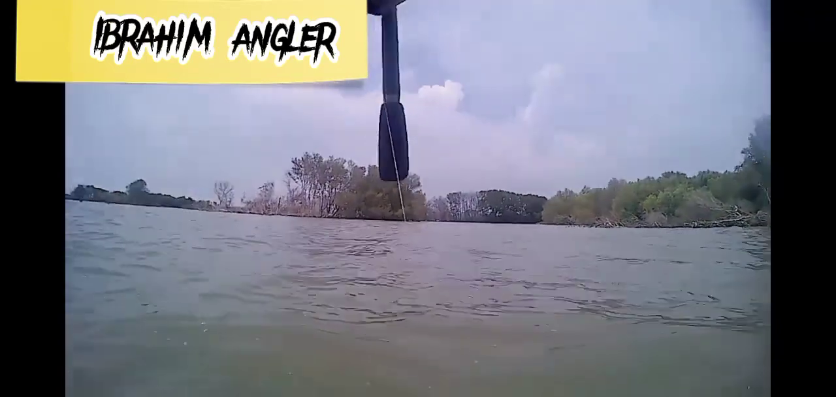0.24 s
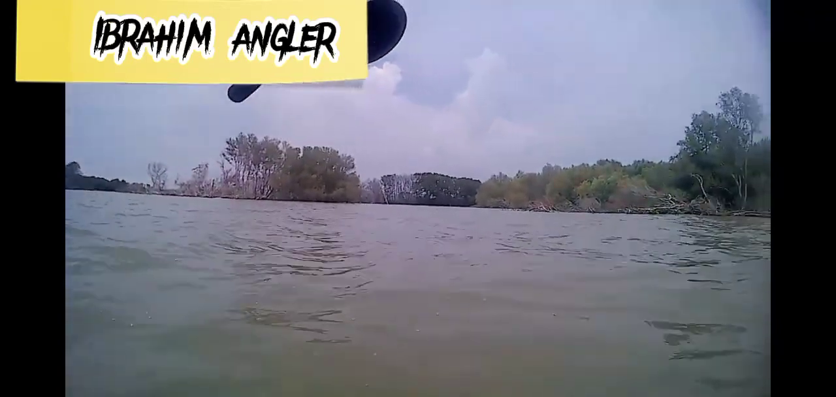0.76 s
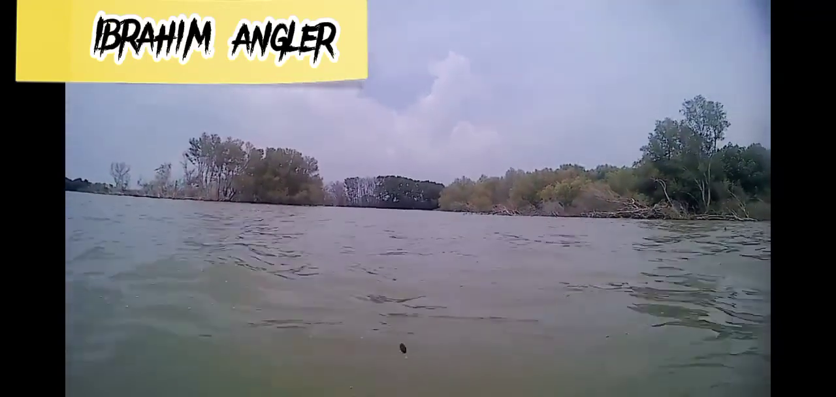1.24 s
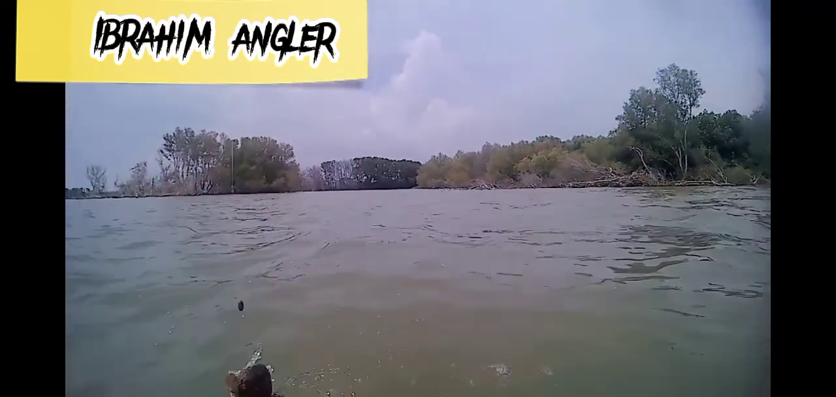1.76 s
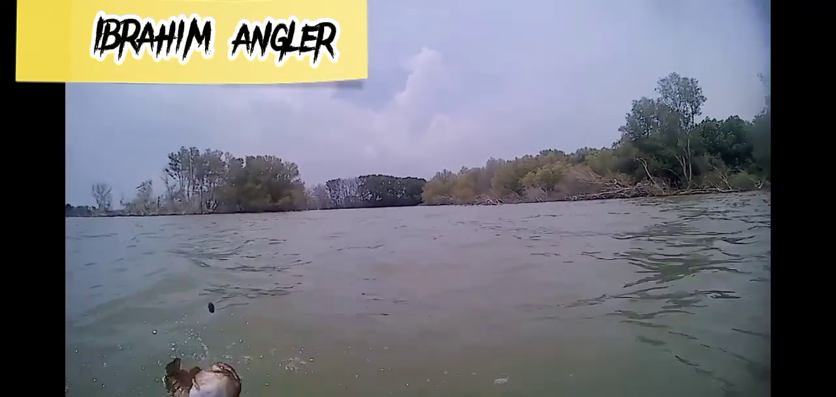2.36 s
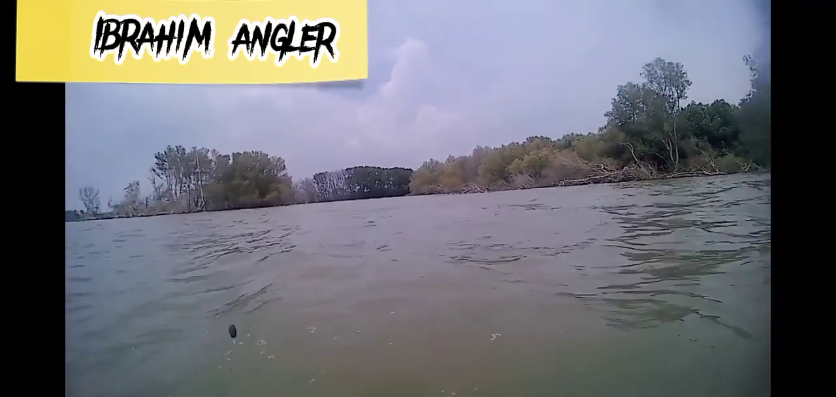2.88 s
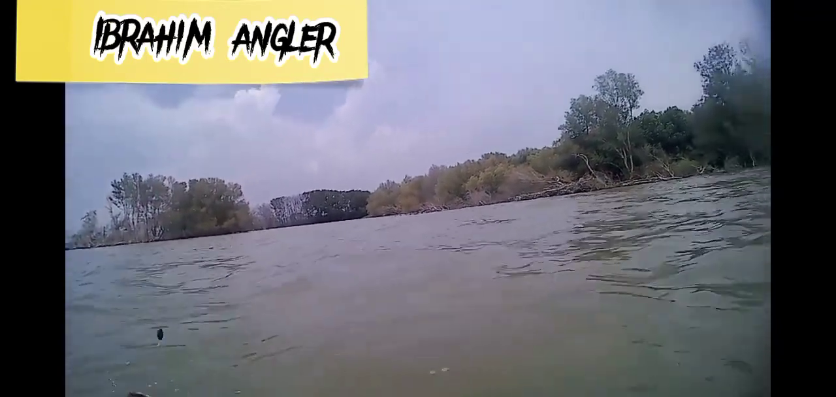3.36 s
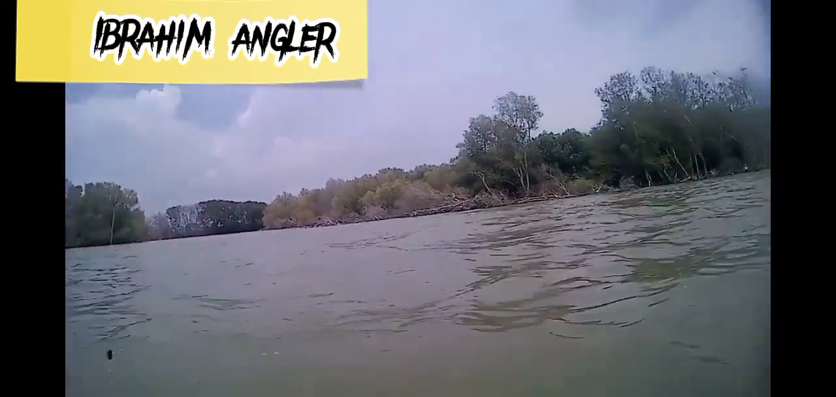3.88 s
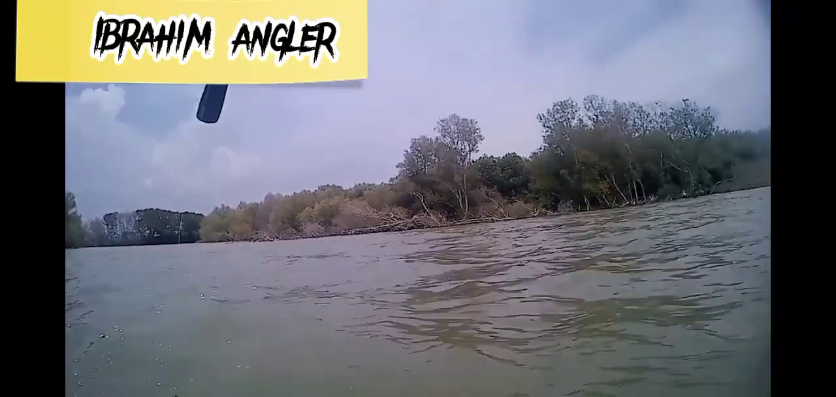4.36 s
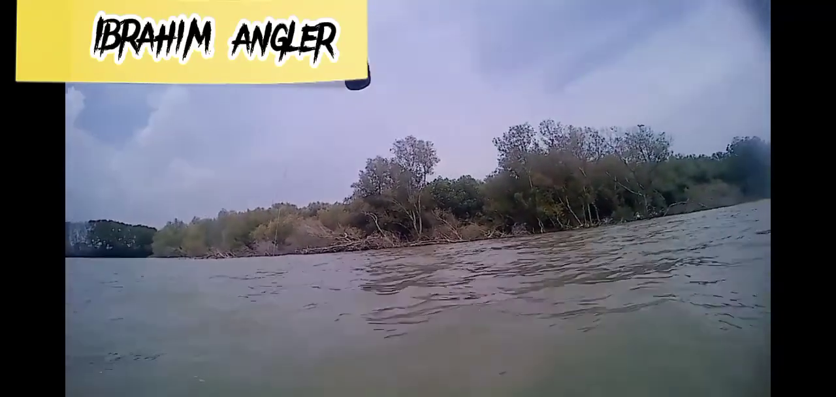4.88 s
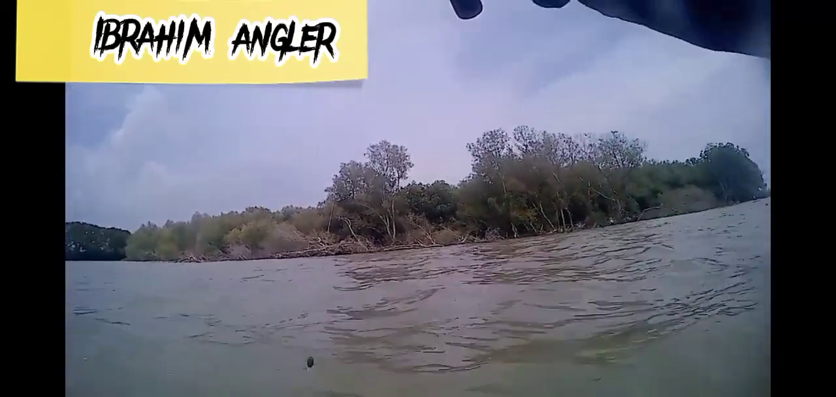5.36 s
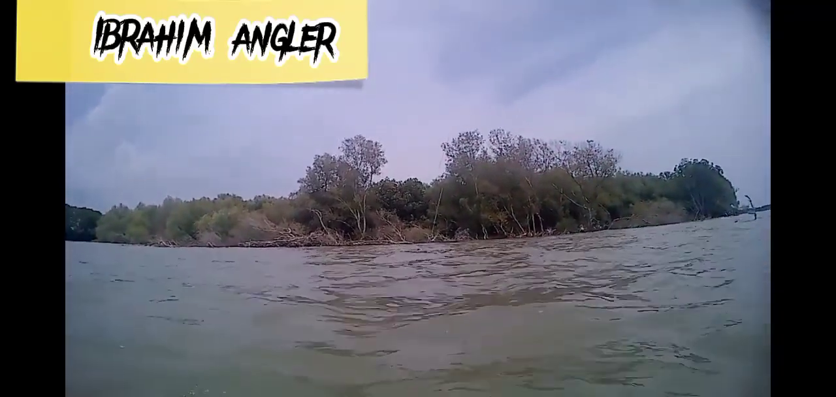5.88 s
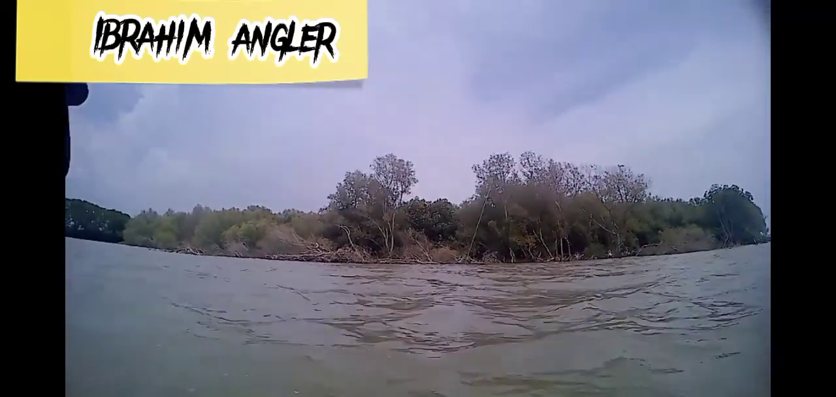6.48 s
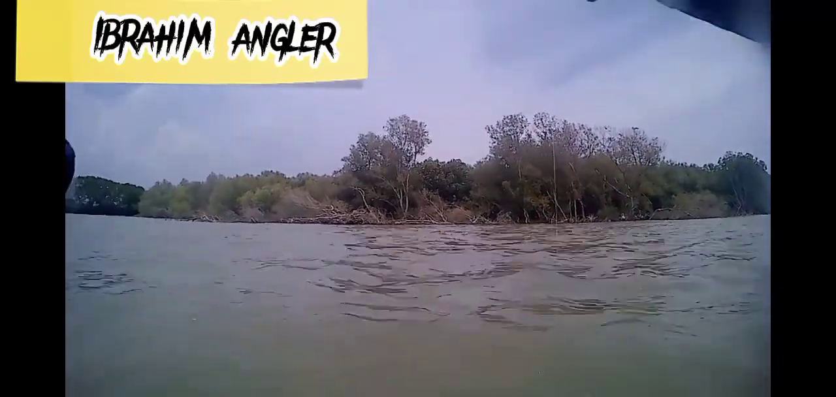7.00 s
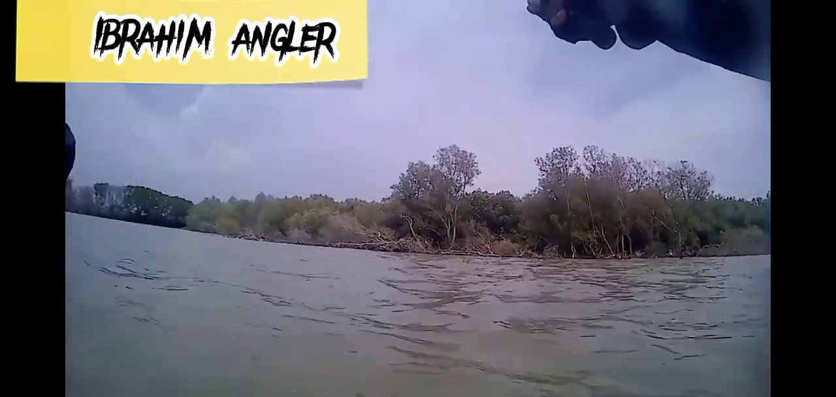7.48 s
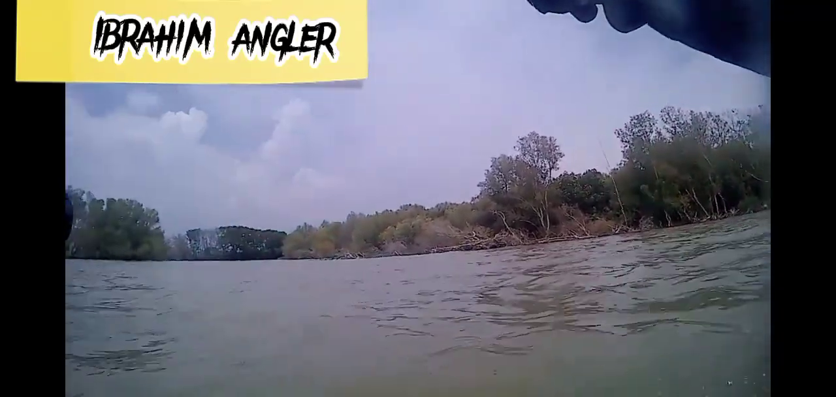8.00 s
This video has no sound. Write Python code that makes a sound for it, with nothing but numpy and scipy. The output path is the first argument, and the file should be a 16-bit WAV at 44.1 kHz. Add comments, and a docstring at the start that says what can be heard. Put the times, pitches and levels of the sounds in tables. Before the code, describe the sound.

A microphone sealed in a plastic case sits just above lake water. After a quiet start, wet slaps and ringing bubbles form one loud splash, followed by gentle uneven lapping, scattered drips and soft plops. Near the end another slosh knocks the case with short low booms and spray, fading to faint trickles. Treble is dull, with thin steady hiss and faint open air.

```python
"""On a lake: water sloshes around a small recorder in a waterproof case held just over the surface.
A sharp splash comes early, wavelets lap and plop, and a second slosh bumps the case with hollow thuds.
Lapping, spray and plops are built from short rising tones and noise; thuds are low, dying tones.
The water's bubbles pass through a ringing plastic shell, and a narrow-band recorder adds a faint hiss."""
import sys
import numpy as np
from scipy import signal
from scipy.fft import rfft, irfft
from scipy.io import wavfile
from scipy.ndimage import uniform_filter1d

SR = 44100
rng = np.random.default_rng(int(sys.argv[2]) if len(sys.argv) > 2 else 0)


def int16_out(signal):
    """Quantize to a 16-bit WAV file."""
    q = np.round(np.clip(np.atleast_2d(signal).T, -1, 1) * 32767)
    wavfile.write(sys.argv[1], SR, q.astype(np.int16))


N = 363384  # length of the scene in samples

# Colour of the dull rumble of moving water. Each row: frequency in Hz, relative level in dB.
SURGE_COLOUR = [(20, -3), (60, -2), (95, -1), (150, -4), (230, -6.5), (350, -9.5), (700, -14.5),
                (1200, -21.5), (2500, -23), (4000, -31)]


def amp(db):
    """Turn decibels into a gain."""
    return 10 ** (np.asarray(db) / 20)


def unit(x):
    """Scale a sound to an average (rms) level of 1."""
    return x / np.sqrt(np.mean(x ** 2))


def add(out, start_s, x):
    """Mix x into out from a given time, dropping what runs past the end."""
    i = int(start_s * SR)
    out[i:i + len(x)] += x[:len(out) - i]


def noise(colour):
    """Noise of rms 1, shaped by a table of frequencies in Hz and levels in dB."""
    hz, db = np.transpose(colour)
    bins = np.fft.rfftfreq(N, 1 / SR)
    # Pitch is judged by ratios, so the levels are joined up on a log frequency scale.
    gain = amp(np.interp(np.log(bins + 1), np.log(hz), db))
    spectrum = rfft(rng.standard_normal(N))
    return unit(irfft(spectrum * gain, N))


def walk(rate):
    """A wandering curve of rms 1 that slides to a new random value about `rate` times a second."""
    step = int(SR / rate)
    held = np.repeat(rng.standard_normal(N // step + 1), step)
    return unit(uniform_filter1d(held, step)[:N])


def shell(x):
    """The case passes sound mostly at the resonances of its plastic walls."""
    # The resonances of the walls. Each row: frequency in Hz, width in Hz, level in dB.
    resonances = [(444, 370, -20), (960, 180, -11.5), (1296, 99, -1.5), (1821, 217, -4.5), (2529, 61, -9.5),
                  (2760, 160, -18), (3413, 193, -12.5)]
    out = 0
    for k, (hz, width_hz, db) in enumerate(resonances):
        b, a = signal.iirpeak(hz, hz / width_hz, SR)
        out = out + (-1) ** k * amp(db) * signal.lfilter(b, a, x)  # neighbours have opposite signs
    return out


def bubble(hz, t60, rise=0.1, swell=0.014):
    """A pocket of air pinches off and rings out, its pitch rising as it nears the surface."""
    t = np.arange(int(t60 * SR)) / SR
    age = t / t60  # 0 at the start, 1 when the ring has died away by 60 dB
    tone = np.sin(2 * np.pi * hz * t * (1 + rise * age))
    onset = 1 - np.exp(-age / swell)
    return tone * onset * np.exp(-np.log(1000) * age)


def fizz(length, rate, spread_db, cycles, smooth, open_share):
    """A crowd of tiny bubbles of all sizes over a smooth rush, mostly heard through the shell; rms 1."""
    crowd = np.zeros(length)
    count = int(rate * length / SR) + 1  # rate is in bubbles per second
    for when, size, pitch, ring in rng.random((count, 4)):
        hz = 750 * 4.6 ** pitch
        gain = amp(-spread_db * np.log(size + 0.027))  # a few bubbles stand out
        add(crowd, when * length / SR, gain * bubble(hz, cycles * (0.41 + ring) / hz))
    crowd = unit(crowd)
    rush = smooth * rng.standard_normal(length)
    return unit(shell(crowd + rush) + open_share * crowd)


def treble(x, edge_hz=2250):
    """The part of a sound that comes from the finest drops."""
    high_pass = signal.butter(4, edge_hz, "high", fs=SR, output="sos")
    return signal.sosfiltfilt(high_pass, x)


def waves():
    """Level of the lapping in dB: each wavelet swells to its crest and drains away, over calm water."""
    # Wavelets against the case. Each row: crest in seconds, level in dB,
    # rise in seconds, fall in seconds; rise and fall each span 10 dB.
    wavelets = [(0.8, -42.5, 0.2, 0.17), (1.35, -52.5, 0.16, 0.28), (1.73, -54.5, 0.11, 0.28),
                (2.03, -53.5, 0.24, 0.21), (2.82, -61.5, 0.15, 0.12), (3.88, -51.5, 0.13, 0.12),
                (4.27, -54.5, 0.26, 0.14), (4.82, -51.5, 0.27, 0.33), (5.48, -53, 0.71, 0.52),
                (5.95, -57.5, 0.29, 0.18), (6.93, -41, 0.2, 0.19)]
    calm_db = -69.5  # lapping between the wavelets
    crest_roundness = 1.17  # 1 is a pointed crest, 2 a bell
    t = np.arange(N) / SR
    power = amp(calm_db) ** 2
    for crest_s, db, rise_s, fall_s in wavelets:
        away = np.maximum((crest_s - t) / rise_s, (t - crest_s) / fall_s)
        power = power + amp(db - 10 * away ** crest_roundness) ** 2
    return 10 * np.log10(power)


def follow(lap_db, law, typical_db=-55):
    """Level in dB of a layer that never quite rests and grows with the lapping."""
    calm_db, added_db, slope = law
    moving_db = added_db + slope * (lap_db - typical_db)
    return 10 * np.log10(amp(calm_db) ** 2 + amp(moving_db) ** 2)


def lapping(level_db, foam_db, flutter_db=2.0, trickle_db=-4):
    """Wavelets break unevenly into a fizz and a trickle of clearer bubbles; foam crackles on top."""
    froth = fizz(N, rate=700, spread_db=0.5, cycles=9.9, smooth=1.0, open_share=0.011)
    trickle = fizz(N, rate=80, spread_db=2.5, cycles=43, smooth=0, open_share=0.2)
    water = (froth + amp(trickle_db) * trickle) * amp(flutter_db * walk(35))
    foam = treble(water)
    body = water - foam
    return unit(body) * amp(level_db) + unit(foam) * amp(foam_db)


def surge(level_db, flutter_db=2.0):
    """The moving water presses on the case with a dull rumble of unsteady level."""
    return noise(SURGE_COLOUR) * amp(level_db + flutter_db * walk(22))


def open_air(level_db=-60):
    """The faint open air of the lake is steady coloured noise."""
    # Colour of the open air. Each row: frequency in Hz, relative level in dB.
    air_colour = [(20, 5), (100, -10), (300, -15.5), (700, -20), (1300, -12.5), (2200, -36), (3600, -21.5),
                  (4000, -18.5)]
    return amp(level_db) * noise(air_colour)


def drips(level_db, rate=7, scatter_db=-1.5, centre_hz=1550, spread_octaves=0.4):
    """Faint stray bubbles at random moments, louder in livelier water: rows of seconds, peak dB, Hz."""
    when, size, pitch = rng.random((int(rate * N / SR), 3)).T
    db = level_db[(when * N).astype(int)] + scatter_db * (2 * size - 1)
    hz = centre_hz * 2 ** (spread_octaves * (2 * pitch - 1))
    return np.c_[when * N / SR, db, hz]


def plops(drip_db, open_share=0.15):
    """Slaps and trapped bubbles sound at their own pitch and ring the shell; low bubbles ring longer."""
    # The clearest bubbles. Each row: start in seconds, peak level in dB, pitch in Hz.
    clear_bubbles = [(.5433, -41.5, 1150), (.661, -22.5, 1570), (.6768, -20.5, 1064), (.694, -24, 1555),
                     (.714, -22, 1330), (.7245, -17, 1136), (.734, -15.5, 1550), (.795, -27, 1615),
                     (1.208, -44, 1220), (1.219, -42.5, 800), (1.340, -37, 1360), (1.3888, -35.5, 1180),
                     (1.411, -36, 1660), (1.435, -34, 1580), (1.791, -37, 1330), (2.063, -32, 1420),
                     (2.755, -46.5, 1370), (3.494, -44.5, 1310), (3.735, -47.5, 854), (3.743, -41, 1330),
                     (3.804, -38.5, 1026), (3.8262, -29.5, 1410), (4.203, -45, 2350), (4.6289, -37, 1310),
                     (4.673, -39.5, 1320), (4.7288, -30.5, 1303), (4.846, -34.5, 1240), (4.909, -37, 1410),
                     (5.1656, -38.5, 1280), (5.312, -37, 1280), (5.3313, -28.5, 1138), (5.388, -49, 596),
                     (5.433, -35, 1090), (5.546, -34, 1460), (6.407, -43, 1600), (6.8115, -34.5, 597),
                     (6.8378, -26, 1620), (6.893, -27.5, 1530), (7.039, -28, 1960), (7.305, -44.5, 2110),
                     (8.227, -42, 2150)]
    # Flat slaps of water that trap no air. Each row: start in seconds, peak level in dB, pitch in Hz.
    flat_slaps = [(.6798, -19, 1330), (0.6991, -22, 1460), (0.727, -13.5, 1790), (0.7303, -16, 2500),
                  (0.8246, -24.5, 1360), (0.912, -32.5, 870), (1.687, -29.5, 1540), (3.882, -41.5, 1850),
                  (6.809, -28.5, 1200), (6.885, -22, 1290), (7.528, -35, 1760), (7.748, -40, 2080),
                  (7.855, -39, 1400)]
    bubble_cycles, slap_t60_s = 37.3, 0.0053  # cycles, or seconds, to die away by 60 dB
    events = [(s, db, hz, bubble_cycles / hz) for s, db, hz in [*clear_bubbles, *drips(drip_db)]]
    events += [(s, db, hz, slap_t60_s) for s, db, hz in flat_slaps]
    out = np.zeros(N)
    for start_s, db, hz, t60 in events:
        pocket = np.r_[bubble(hz, t60), np.zeros(SR // 20)]  # silence leaves room for the shell to ring
        soft_start = 1 - np.exp(-np.arange(len(pocket)) * hz / SR / 2)
        ring = shell(pocket) + open_share * pocket * soft_start
        add(out, start_s, amp(db) * ring / np.abs(ring).max())
    return out


def sprays(fall_db=-3, rumble_db=-12):
    """Thrown water patters down: sudden start, slight fade and quick end, over a dull rumble."""
    # Bursts of spray. Each row: start in seconds, level in dB before the treble change,
    # length in seconds, extra treble in dB (fine spray is brighter).
    bursts = [(0.664, -30, 0.086, 3), (0.725, -27, .012, 5.5), (0.744, -40.5, 0.12, 0),
              (1.162, -48, .08, -3), (1.381, -46.5, 0.052, -5), (1.772, -49.5, 0.03, 7.5),
              (2.053, -51, 0.03, 14), (2.125, -62, 0.034, 17.5), (3.868, -53.5, 0.039, 1.5),
              (5.523, -47, 0.074, -0.5), (6.816, -41, 0.016, 4), (7.019, -50.5, .09, 7),
              (7.459, -57, 0.089, -1), (7.852, -56, 0.035, 7.5)]
    out, weight = np.zeros(N), np.zeros(N)
    for start_s, db, seconds, treble_db in bursts:
        n = int(seconds * SR)
        fade = amp(fall_db * np.linspace(-.5, .5, n))
        shape = signal.windows.tukey(n, .06) * fade
        patter = fizz(n, rate=1000, spread_db=3.5, cycles=8.9, smooth=1.0, open_share=0.048)
        patter = patter + (amp(treble_db) - 1) * treble(patter)
        add(out, start_s, amp(db) * shape * patter)
        add(weight, start_s, amp(db) * shape)
    return out + amp(rumble_db) * weight * noise(SURGE_COLOUR)


def thuds(bend=0.86, settle_s=0.0023, knock_db=-25, overtone_hz=215, overtone_db=-7, overtone_t60=0.045):
    """A bump makes the case boom, with a short overtone; the pitch sags as the push lets go."""
    # Bumps on the case. Each row: start in seconds, level of the boom in dB,
    # ring time in seconds (to die away by 60 dB).
    bumps = [(6.686, -40, 0.3), (6.809, -28, 0.15), (6.9, -15, 0.088), (6.945, -30, 0.13),
             (7.014, -23, 0.087), (7.044, -30.5, 0.19), (7.098, -31, 0.14)]
    boom_hz = 106.8  # the pitch the boom settles to
    out = np.zeros(N)
    t = np.arange(SR // 4) / SR
    # The extra turns make the pitch start high and sag within a few milliseconds.
    turns = boom_hz * (t + bend * settle_s * (1 - np.exp(-t / settle_s)))
    overtone = np.sin(2 * np.pi * overtone_hz * t) * np.exp(-np.log(1000) * t / overtone_t60)
    for start_s, db, t60 in bumps:
        rattle = amp(knock_db) * unit(shell(rng.standard_normal(len(t))))
        boom = (np.sin(2 * np.pi * turns) + rattle) * np.exp(-np.log(1000) * t / t60)
        add(out, start_s, amp(db) * (boom + amp(overtone_db) * overtone))
    return out


def scene():
    """Wavelets drive the lapping, foam, surge and drips near the case, over the faint open air."""
    # How three layers grow with the lapping. Each holds: level in calm water in dB,
    # level added at typical lapping in dB, growth in dB per dB of lapping.
    surge_law = (-58, -53.5, 0.86)
    foam_law = (-79.5, -69.5, 0.91)
    drip_law = (-54.5, -48, 0.62)
    lap_db = waves()
    water = lapping(lap_db, follow(lap_db, foam_law))
    water = water + surge(follow(lap_db, surge_law))
    water = water + plops(follow(lap_db, drip_law)) + sprays()
    return (water + open_air() + thuds())[None]  # one channel


def record(dry, band_hz=4050, top_hz=15500, hiss_db=-78):
    """The recorder cuts off the scene's high treble and adds a thin, even hiss that reaches higher."""
    scene_filter = signal.ellip(7, .5, 60, band_hz, fs=SR, output="sos")
    narrow = signal.sosfilt(scene_filter, dry)
    hissing = narrow + amp(hiss_db) * rng.standard_normal(dry.shape)
    top_filter = signal.ellip(10, .2, 70, top_hz, fs=SR, output="sos")
    return signal.sosfilt(top_filter, hissing)


dry = scene()
out = record(dry)
int16_out(out)
```